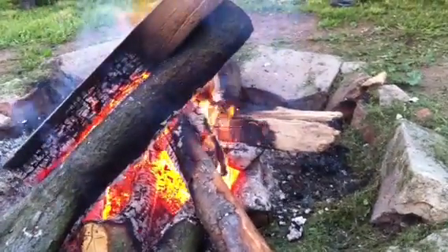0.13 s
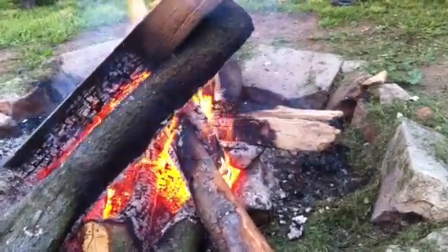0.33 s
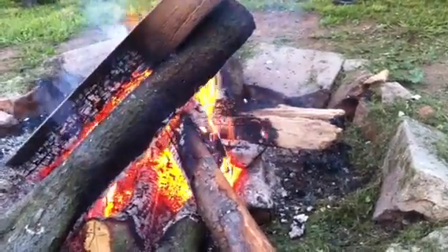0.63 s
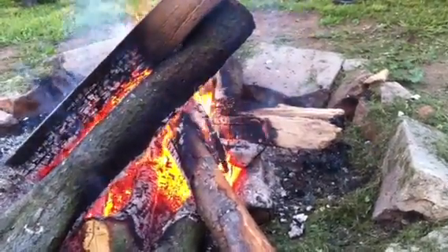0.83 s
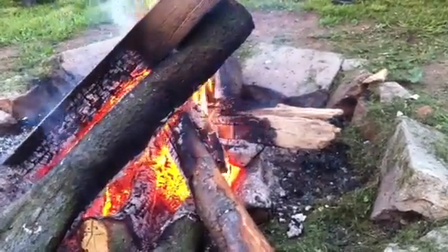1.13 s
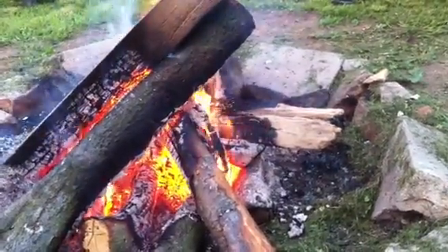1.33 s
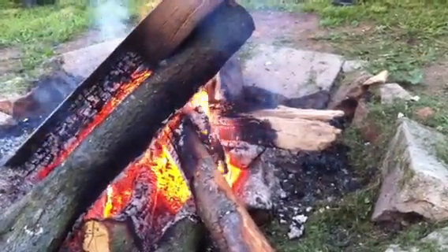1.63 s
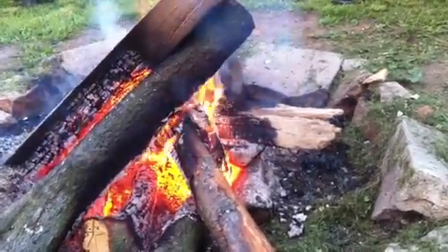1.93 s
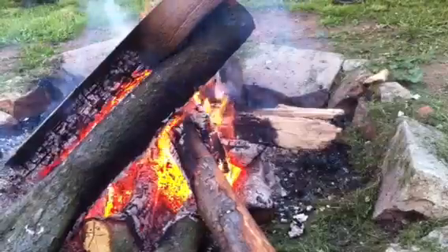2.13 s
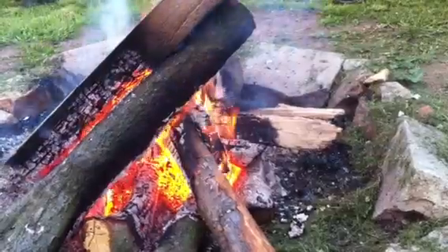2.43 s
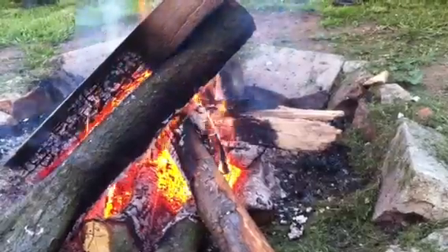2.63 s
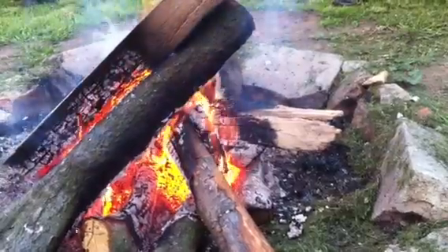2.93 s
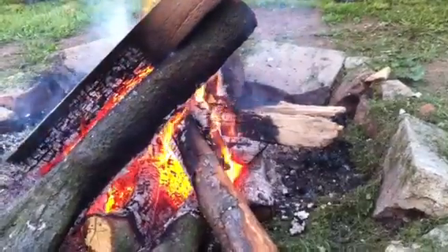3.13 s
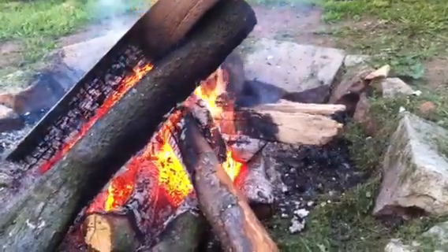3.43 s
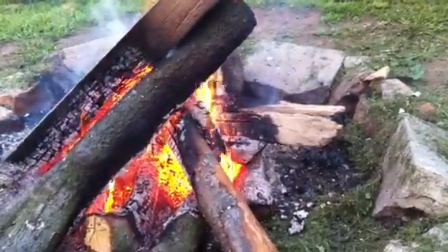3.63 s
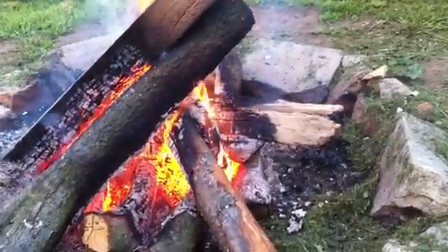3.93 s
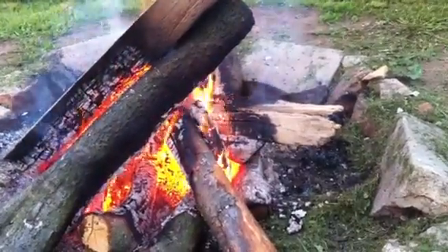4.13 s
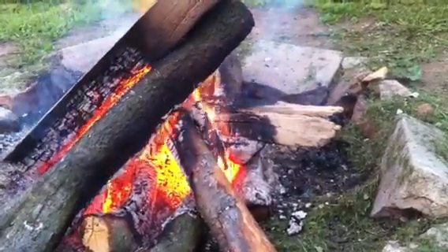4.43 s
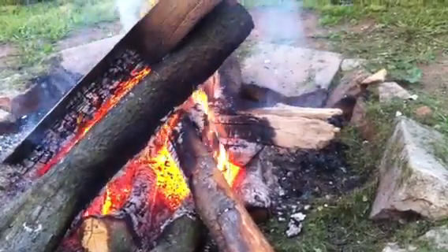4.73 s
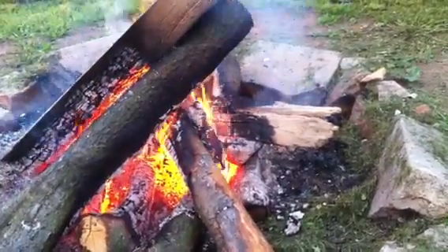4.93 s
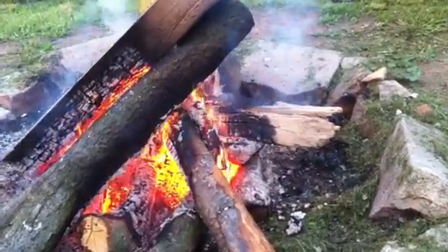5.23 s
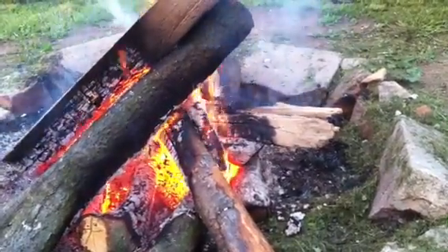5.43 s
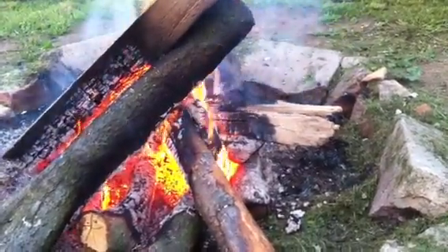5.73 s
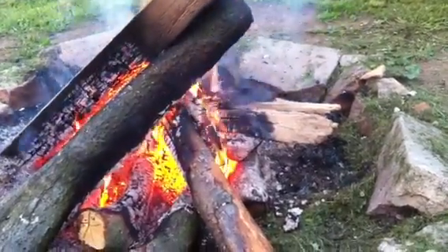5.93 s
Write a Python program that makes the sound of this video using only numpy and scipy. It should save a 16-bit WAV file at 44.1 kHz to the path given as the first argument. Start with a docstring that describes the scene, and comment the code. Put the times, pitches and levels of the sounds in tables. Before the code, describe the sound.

Outdoors, one microphone hears a wood fire: a low flickering murmur, soft airy hiss, a patter of tiny ticks and irregular dry pops. At 0.04 s a nightingale flicks out a quick, high slur that plunges, then falls silent. Faint far birds call and twitter thinly until about 1.5 s, with stray notes up to 2.8 s, while pops cluster around 1.4-1.8 s. At 2.5 s the singer gives a clear note stepping upward, at 3.0 s a falling slur, at 3.2 s a small arching note, then dry ticks. From 3.47 to 4.6 s harsh two-voiced rasps alternate with rounded double chirps, four times a second. A log cracks sharply with a short woody ring at 3.92 s. A strong snap at 4.68 s meets a sharp falling slur. Six low, softer whistles, each scooping up, run from 4.8 to 6 s; another bright pop lands at 5.26 s. Leaves and stones add slight reflections.

```python
"""Far birds call faintly over a murmuring, hissing, popping wood fire as a nightingale opens its strophe close by.
Its syrinx tones bend through thin slurs and two longer notes, break into dry ticks, then trade double chirps
with harsh two-voiced rasps. Amid this trill a log cracks: a noise tear with ringing wood modes.
Six low scooped whistles end the song. Pops are filtered bursts, flames and steam are tinted noise,
and the far calls are wavering sine glides."""
import sys
import numpy as np
from scipy import signal
from scipy.fft import rfft, irfft
from scipy.io import wavfile
from scipy.ndimage import uniform_filter1d

SR = 44100
rng = np.random.default_rng(int(sys.argv[2]) if len(sys.argv) > 2 else 0)


def master_out(mix):
    """Clip the mix to full scale and print it as 16-bit PCM to the path in sys.argv[1]."""
    frames = np.transpose(np.atleast_2d(mix))
    ceiling = np.clip(frames, -1, 1)
    pcm = np.round(ceiling * 32767).astype(np.int16)
    wavfile.write(sys.argv[1], SR, pcm)


N = 267775  # samples, about 6.07 s

# All song levels below are those of the voice itself, ahead of the garden's reflections.
# single slurs: (t/s, length/s, first f/Hz, middle f/Hz, last f/Hz, level/dB, swell over the note/dB, roughness 0-1)
SLURS = [(.037, 0.0119, 6530, 6030, 6950, -42, 20.5, 0.14),
         (0.05, 0.0212, 7060, 8480, 6830, -49.5, 0.5, 0.14),
         (0.0715, 0.0298, 7020, 4766, 3920, -34.5, -19.5, 0.02),
         (2.952, 0.01195, 4060, 5400, 6820, -45, 11, 0), (2.995, 0.0256, 7970, 7150, 6630, -62, 9.5, .05),
         (3.017, 0.0439, 6840, 5814, 5057, -37, -3.5, 0.04),
         (3.131, 0.034, 1960, 2174, 2078, -39.5, 2.5, 0.07),
         (4.449, 0.02596, 5837, 5723, 6414, -28.5, -3.5, 0.12),
         (4.484, .012, 6815, 4998, 3500, -33.5, -19, 0.42),
         (4.7, 0.01465, 6990, 4996, 3876, -31.5, 2, 0.38),
         (4.709, 0.04, 2494, 1900, 1180, -52.5, -13.5, 0.42),
         (4.718, 0.0287, 4288, 3679, 2400, -39, -19, 0.35)]
SLUR_ATTACK, SLUR_RELEASE = 0.2053, 0.22  # shares of a slur's length
# two longer notes, one stepping up and one arching over, as points along each:
# (t/s, f/Hz before smoothing, level/dB before the note's gain)
BENT_NOTES = [
    [(2.53, 3284, -66), (2.55, 3299, -51.5), (2.58, 3264, -50.5), (2.598, 3533, -63.5), (2.62, 3706, -44),
     (2.644, 3712, -37.5), (2.66, 3720, -59.5)],
    [(3.205, 2695, -65), (3.213, 2744, -38), (3.231, 3134, -40.5), (3.239, 3036, -36), (3.257, 2466, -38.5),
     (3.263, 2520, -42), (3.27, 2546, -69.5)],
]
# dry ticks that lead into the trill: (t/s, level/dB)
TICKS = [(3.33, -44), (3.358, -43), (3.385, -49)]
TICK_S, TICK_HZ = 0.0083, (5400, 4383, 4120)  # length; first, middle and last pitch
# double chirps: (t/s, gap to the second chirp/s, length of each/s, top f/Hz before the pair's factor, level/dB)
CHIRPS = [(3.57, 0.0448, 0.0326, 2372, -31.5), (3.809, 0.0465, 0.0363, 2386, -31.5),
          (4.054, 0.04393, 0.0393, 2348, -31.5), (4.303, 0.04385, 0.03935, 2344, -32),
          (4.546, 0.0423, 0.0365, 2276, -32)]
# the pitch starts this share low; level at the bottom; share of the climb where the voice is at full level
CHIRP_DEPTH, CHIRP_SOFT_DB, CHIRP_OPEN = 0.3096, -18.5, 0.384
# first and second chirp of a pair: (pitch factor, lowest at, highest at, release), last three in shares of length
CHIRP_PAIR = [(0.998, 0.133, 0.7018, 0.175), (1.036, 0.044, .66, 0.374)]
# rasps between the chirps: (t/s, length/s, pitch factor, level/dB before the stroke's own, roughness 0-1)
RASPS = [(3.467, 0.04585, 1.01, -36, 0.25), (3.708, 0.0444, 1.047, -31.5, 0.34),
         (3.952, .046, 1.026, -32, 0.37), (4.205, 0.0481, 0.9845, -35.5, 0.5)]
# both sides of the syrinx sweep up, then one snaps down: (start and length as shares of the rasp,
# first f/Hz, middle f/Hz, last f/Hz before the rasp's factor, relative level/dB, swell/dB, added roughness)
RASP_STROKES = [(0, 0.63, 4300, 5694, 6670, -2, -1, 0), (-.03, 0.75, 3300, 4546, 5800, -5.5, 1.5, 0),
                (0.739, .25, 6900, 4500, 3450, -2, -18.5, 0.108)]
# closing whistles: (t/s, length/s, held f/Hz, level/dB, waver as a share of the pitch, upper voice level/dB)
WHISTLES = [(4.806, .099, 1633, -45.5, 0.0172, -53), (4.985, .11, 1682, -45.5, 0.00636, -59),
            (5.178, .122, 1708, -46, 0.0038, -61), (5.383, 0.1412, 1765, -42, 0.0051, -63),
            (5.619, 0.1338, 1745, -42, 0.0043, -63.5), (5.849, 0.134, 1760, -42.5, 0.0041, -64)]
# each whistle slides up from below: share of its pitch, time, level at the bottom
SCOOP, SCOOP_S, SCOOP_DB = 0.2844, 0.01802, -5.5
# and sinks as it ends: share of its pitch, time; the level sags throughout
DROOP, DROOP_S, WHISTLE_SAG_DB_PER_S = 0.035, 0.0148, -9
WHISTLE_ATTACK_S, WHISTLE_RELEASE_S = 0.00792, 0.0189
UPPER_LEAD_S, UPPER_S, UPPER_HZ = .009, 0.02694, (1820, 2400, 2870)  # upper voice: head start, length, pitches

LOG_CRACK_S = 3.9245
# modes of the splitting log: (f/Hz, level/dB before the band-pass, t60/s)
LOG = [(184.6, -23, 0.026), (433, -21, 0.027), (553, -25.5, 0.0329), (798, -21, 0.0249),
       (1081, -28, 0.0346), (1372, -19.5, 0.0173), (1547.6, -14, 0.0215), (1946, -17.5, 0.019),
       (2458, -31, 0.047), (2841, -23.5, 0.0206), (3210, -26.5, 0.021), (3420, -19.5, 0.017),
       (3750, -24, 0.033), (4374, -29, 0.0142), (4425, -34, 0.0475), (7658, -26, 0.012)]
# loud pops of the fire: (t/s, knock level/dB, crack level/dB, snap level/dB),
# each the level of the first instant, before the mix with reflections
POPS = [(0.2714, -54, -55, -44.5), (0.3181, -47, -50, -44), (.414, -49, -51, -53),
        (0.6266, -54, -51.5, -37.5), (0.6412, -60, -55, -37.5), (0.6861, -59, -58, -50.5),
        (0.8717, -54.5, -55.5, -54.5), (1.0834, -48, -50, -44), (1.4447, -53.5, -41.5, -70.5),
        (1.4994, -58, -44.5, -42), (1.5341, -45.5, -44.5, -37.5), (1.6967, -43, -46.5, -42.5),
        (1.734, -54, -54.5, -65), (1.8302, -45, -45, -41.5), (2.335, -54.5, -58.5, -67.5),
        (2.4557, -72, -59, -51.5), (2.827, -49, -44.5, -38.5), (3.405, -43, -37, -41.5),
        (3.671, -49, -41, -38.5), (4.1601, -58.5, -64.5, -54), (4.3982, -54, -49.5, -46),
        (4.4057, -51.5, -59, -49), (4.5176, -58, -51, -51), (4.6768, -38, -35, -26.5),
        (4.9598, -50, -48.5, -43.5), (5.2623, -42, -34.5, -25), (5.7063, -43.5, -36.5, -47),
        (6.0026, -50, -42, -47)]
# knock, crack and snap in turn: (low f/Hz, high f/Hz)
POP_BANDS = [(1100, 3160), (4700, 8270), (9200, 15100)]
# spectrum of the flames' murmur: (f/Hz, relative density/dB per Hz)
FLAME = [(15, -66.5), (25, -33.5), (43, -45.5), (90, -10.5), (189, 0.5), (240, -7), (452, -14), (648, -19),
         (756, -18), (913, -20), (1030, -19.5), (1500, -29), (1950, -33), (3300, -120)]
# spectrum of the escaping steam: (f/Hz, relative density/dB per Hz)
HISS = [(300, -6.5), (1200, 0), (2000, 0.5), (3500, -2.5), (6000, -5), (8000, -3.5), (10000, -7),
        (13000, -2.5), (15700, -4), (16100, -41.5)]
FLAME_DB, HISS_DB = -66.5, -67.5  # before flicker, sizzle and the slow drift of the hiss

# the clearer calls of far birds: (t/s, length/s, first f/Hz, middle f/Hz, last f/Hz, level/dB before the trees)
FAR_NOTES = [(0, 0.0257, 2782, 2750, 2590, -61.5), (0.455, 0.117, 1830, 2000, 1895, -63.5),
             (0.783, 0.121, 3310, 3750, 4300, -65), (0.877, 0.252, 1950, 2009, 1991, -71),
             (0.956, 0.08, 4434, 4420, 4470, -61), (1.931, 0.097, 2640, 2600, 2580, -68),
             (2.222, 0.1816, 2370, 2290, 2228, -66), (2.069, .017, 1792, 2200, 2830, -59.5),
             (2.384, 0.0092, 1990, 2055, 2020, -54.5), (2.804, 0.0207, 1246, 1380, 1480, -54),
             (2.825, 0.0151, 1880, 2000, 1935, -50.5)]
# one far bird twitters on two thin notes in turn; level before the trees
TWITTER_FROM_S, TWITTER_TO_S, TWITTER_NOTE_S = .157, 1.54, 0.058
TWITTER_HZ, TWITTER_DB = (5710, 4880), -67.5
EDGE_HZ = 16500  # top of the recorder's band


def nightingale(dip=0.83, leaves_db=-9):
    """The song, with a ground reflection, scatter from leaves and branches, and a faint garden echo."""
    song = strophe()
    direct = song + amp(-18) * delayed(song, .0052)
    # small leaves throw back the high notes most
    leaves = amp(leaves_db) * scatter(band(song, 3260, 10000), 0.00089, 0.0565)
    branches = amp(-15.5) * scatter(song, 0.0066, 0.0556)
    garden = amp(-38) * scatter(song, .02, .4)
    heard = direct + leaves + branches + garden
    # a hollow in the spectrum splits the rasps in two bands
    return heard - np.clip(dip, 0, .9) * band(heard, 4178, 5252, order=1)


def strophe():
    """Slurs, bent notes and ticks, a trill of double chirps and rasps, then whistles that start on two voices."""
    song = np.zeros(N)
    for s, length, *pitches_hz, db, swell_db, rough in SLURS:
        add(song, s, slur(length, pitches_hz, db, swell_db, rough))
    for points in BENT_NOTES:
        add(song, *bent_note(points))
    for s, db in TICKS:
        add(song, s, slur(TICK_S, TICK_HZ, db, swell_db=2, rough=0.971))
    for s, gap, *note in CHIRPS:
        for start, shape in zip((s, s + gap), CHIRP_PAIR):
            add(song, start, chirp(*note, *shape))
    for s, length, pitch, db, rough in RASPS:
        add_rasp(song, s, length, pitch, db, rough)
    for s, *note, upper_db in WHISTLES:
        add(song, s, whistle(*note))
        add(song, s - UPPER_LEAD_S, slur(UPPER_S, UPPER_HZ, upper_db, swell_db=-12, rough=0.52))
    return song


def slur(length, pitches_hz, db, swell_db, rough):
    """One smooth bend through a first, middle and last pitch, swelling or fading as it goes."""
    u = np.linspace(0, 1, int(length * SR))
    hz = np.polyval(np.polyfit([0, .5, 1], pitches_hz, 2), u)
    level_db = db + swell_db * (u - .5)
    return syllable(hz, rough) * amp(level_db) * envelope(u, SLUR_ATTACK, SLUR_RELEASE)


def bent_note(points, gain_db=3, rough=0.032):
    """A clear note that follows its own pitch and level; returns its start and sound."""
    s, hz, db = np.transpose(points)
    t = np.arange(s[0], s[-1], 1 / SR)
    smooth_hz = uniform_filter1d(np.interp(t, s, hz), size=200)
    return s[0], syllable(smooth_hz, rough) * amp(gain_db + np.interp(t, s, db))


def chirp(length, top_hz, db, pitch, low_at, high_at, release, attack=0.0384, rough=0.032):
    """The pitch swings from a trough over a crest; the voice opens as it climbs."""
    u = np.linspace(0, 1, int(length * SR))
    height = np.sin(np.pi / 2 * (u - low_at) / (high_at - low_at)) ** 2
    hz = pitch * top_hz * (1 - CHIRP_DEPTH * (1 - height))
    level_db = db + CHIRP_SOFT_DB * np.maximum(1 - height / CHIRP_OPEN, 0)
    return syllable(hz, rough) * amp(level_db) * envelope(u, attack, release)


def add_rasp(song, s, length, pitch, db, rough):
    """Two rough voices of the syrinx sweep up together, then one snaps down."""
    for start, share, *pitches_hz, stroke_db, swell_db, harsher in RASP_STROKES:
        stroke_hz = pitch * np.array(pitches_hz)
        stroke = slur(share * length, stroke_hz, db + stroke_db, swell_db, rough + harsher)
        add(song, s + start * length, stroke)


def whistle(length, held_hz, db, waver, waver_hz=30, rough=0.0423,
            shimmer_db=.6, scoop_shimmer_db=2, shimmer_hz=70):
    """A low note that scoops up unsteadily, holds with a slight waver, and droops at the end."""
    t = np.arange(0, length, 1 / SR)
    below = np.exp(-(t / SCOOP_S) ** 2)
    droop = DROOP * np.exp((t - length) / DROOP_S)
    hz = held_hz * (1 - SCOOP * below - droop + waver * wander(len(t), waver_hz))
    level_db = db + SCOOP_DB * below + WHISTLE_SAG_DB_PER_S * (t - length / 2)
    level_db = level_db + (shimmer_db + scoop_shimmer_db * below) * wander(len(t), shimmer_hz)
    return syllable(hz, rough) * amp(level_db) * envelope(t, WHISTLE_ATTACK_S, WHISTLE_RELEASE_S)


def syllable(hz, rough, flutter=0.0653, flutter_hz=700, rasp_db=-3, rasp_hz=1000,
             second_db=-34, third_db=-34, harsh_db=30):
    """A nearly pure syrinx tone; in rough notes the pitch flutters and the tone breaks up into a band of noise."""
    rough = np.clip(rough, 0, 1)
    hz = hz * (1 + flutter * rough * wander(len(hz), flutter_hz))
    phase = 2 * np.pi * np.cumsum(hz) / SR
    # only the lower notes carry overtones, the octave more so when the voice is harsh
    octave = amp(second_db + harsh_db * rough) * np.sin(2 * phase) * (hz < SR / 9)
    twelfth = amp(third_db) * np.sin(3 * phase) * (hz < SR / 11)
    tone = np.sin(phase) + octave + twelfth
    rasp = wander(len(hz), rasp_hz) * np.sin(phase) + wander(len(hz), rasp_hz) * np.cos(phase)
    return np.sqrt(1 - rough ** 2) * tone + rough * amp(rasp_db) * rasp


def log_crack(tear_s=0.00171, tear_db=-21, fizz_db=-21):
    """A log splits: a short tearing burst, the ring of the wood, and reflections from the stones."""
    t = np.arange(SR // 8) / SR
    ring = np.zeros(len(t))
    for k, (hz, db, t60) in enumerate(LOG):
        ring += (-1) ** k * amp(db - 60 * t / t60) * np.sin(2 * np.pi * hz * t)
    noise = rng.standard_normal(len(t))
    tear = amp(tear_db) * unit(band(noise, 1290, 9140)) + amp(fizz_db) * unit(band(noise, 10680, 13100))
    crack = np.zeros(N)
    add(crack, LOG_CRACK_S, band(ring + tear * np.exp(-t / tear_s), 98, 17000))
    echo = amp(-12) * band(delayed(crack, .0108), 2430, 14140)
    stones = amp(-12.5) * scatter(crack, 0.0039, 0.0324)
    tail = amp(-35.5) * scatter(crack, 0.015, 0.17)
    return crack + echo + stones + tail


def crackle(ticks_per_s=60, tick_db=-73, spread_db=4.5, dull_db=-5, small_pops_per_s=2, small_pop_db=-57):
    """Loud pops, stray small ones and a patter of tiny ticks, thrown about by the logs and the ring of stones."""
    pops = np.zeros(N)
    for s, *levels_db in POPS:
        add(pops, s, pop(levels_db))
    for per_s, base_db, range_db in [(ticks_per_s, tick_db, spread_db), (small_pops_per_s, small_pop_db, 0)]:
        for when, size, colour in rng.random((int(per_s * N / SR), 3)):
            db = base_db + range_db * min(-np.log(size), 4)  # many weak, few strong
            add(pops, when * N / SR, pop([db + 2 * dull_db * colour, db + dull_db * colour, db]))
    # rough bark returns less of the top
    near = amp(-6.5) * scatter(band(pops, 660, 10160, order=1), 0.0015, 0.0234)
    tail = amp(-49.5) * scatter(pops, 0.009, .16)
    return amp(-3.5) * pops + near + tail


def pop(levels_db, burst_s=0.000453, grit_db=-11):
    """A gas pocket bursts in one spike and a gritty instant, with its own share of knock, crack and snap."""
    t = np.arange(400) / SR
    burst = (t == 0) + amp(grit_db) * rng.standard_normal(len(t)) * np.exp(-t / burst_s)
    sound = np.zeros(len(t))
    for k, (db, (lo, hi)) in enumerate(zip(levels_db, POP_BANDS)):
        part = (-1) ** k * band(burst, lo, hi)
        first_rms = np.sqrt(np.mean(part[:66] ** 2))  # over the first 1.5 ms
        sound += amp(db) * part / first_rms
    return sound


def flames(flicker_db=2.04, flicker_hz=14, sizzle_db=1.0):
    """The low murmur of flickering flames under the hiss of steam leaving the wood."""
    murmur = tinted_noise(FLAME, patchy_db=1.5) * amp(FLAME_DB + flicker_db * wander(N, flicker_hz))
    steam = tinted_noise(HISS, patchy_db=1.5) * amp(HISS_DB + sizzle_db * wander(N, 22.1))
    drift_db = np.interp(np.arange(N) / SR, [0, 2.2, 4.5, 6], [-0.97, -1.5, 1, 1.0])
    return murmur + steam * amp(drift_db)


def far_birds(waver=0.0084):
    """Faint wavering glides, blurred by the trees between."""
    calls = np.zeros(N)
    for s, length, first, middle, last, db in list(FAR_NOTES) + twitter():
        u = np.linspace(0, 1, int(length * SR))
        hz = np.interp(u, [0, .5, 1], [first, middle, last]) * (1 + waver * wander(len(u), 80))
        swell = np.sqrt(4 * u * (1 - u))
        add(calls, s, amp(db) * swell * np.sin(2 * np.pi * np.cumsum(hz) / SR))
    return amp(-4.5) * calls + amp(-7.5) * scatter(calls, 0.0031, 0.212)


def twitter(count=12, loose_s=.025, stray=0.02655, bend=0.013, uneven_db=2):
    """Loosely timed notes, high and low in turn, each with its own pitch, bend and strength."""
    starts = np.linspace(TWITTER_FROM_S, TWITTER_TO_S, count)
    notes = []
    for k, (late, higher, louder, *bends) in enumerate(rng.uniform(-1, 1, (count, 6))):
        pitches_hz = TWITTER_HZ[k % 2] * (1 + stray * higher + bend * np.array(bends))
        db = TWITTER_DB + uneven_db * louder
        notes.append((starts[k] + loose_s * late, TWITTER_NOTE_S, *pitches_hz, db))
    return notes


def tinted_noise(spectrum, patchy_db):
    """Noise of a given spectrum, rms 1, whose level drifts in small patches of time and frequency."""
    hz = np.fft.rfftfreq(2048, 1 / SR)
    a, b, patches = rng.standard_normal((3, N // 512 + 5, len(hz)))
    f, db = np.transpose(spectrum)
    patches = unit(uniform_filter1d(uniform_filter1d(patches, size=8, axis=0), size=20, axis=1))
    level_db = np.interp(np.log(hz + 1), np.log(f), db) + patchy_db * patches
    frames = (a + 1j * b) * amp(level_db)
    return unit(signal.istft(frames.T, nperseg=2048, noverlap=1536)[1][:N])


def scatter(x, first_s, t60):
    """Dense reflections that set in after a delay and die away; taps of energy 1."""
    t = np.arange(SR // 2) / SR
    taps = rng.standard_normal(len(t)) * (t > first_s) * amp(-60 * t / t60)
    return signal.fftconvolve(x, taps / np.linalg.norm(taps))[:N]


def delayed(x, s):
    """One reflection, s seconds later."""
    return np.interp(np.arange(N) - s * SR, np.arange(N), x, left=0)


def wander(size, rate_hz):
    """Smooth random drift of about rms 1, fading out above a rate."""
    padded = size + SR // 10
    hz = np.fft.rfftfreq(padded, 1 / SR)
    spectrum = rfft(rng.standard_normal(padded)) * np.exp(-(hz / rate_hz) ** 2)
    return unit(irfft(spectrum))[:size]


def envelope(t, attack_s, release_s):
    """Smooth attack, hold, smooth release; times in the unit of t."""
    ramp = np.minimum(t / attack_s, (t[-1] - t) / release_s)
    return np.sin(np.pi / 2 * np.clip(ramp, 0, 1)) ** 2


def band(x, lo_hz, hi_hz, order=2):
    """Causal band-pass."""
    edges_hz = np.clip([lo_hz, hi_hz], 20, .49 * SR)
    return signal.sosfilt(signal.butter(order, edges_hz, "band", fs=SR, output="sos"), x)


def amp(db):
    """Decibels to gain."""
    return 10 ** (np.asarray(db) / 20)


def unit(x):
    """Scales to rms 1."""
    return x / np.sqrt(np.mean(x ** 2) + 1e-20)


def add(mix, s, sound):
    """Mixes a sound in at time s."""
    part = mix[max(round(s * SR), 0):][:len(sound)]
    part += sound[:len(part)]


def scene():
    """Birds and fire at one microphone."""
    return (nightingale() + log_crack() + crackle() + flames() + far_birds())[None]


def record(dry):
    """The band limit of the recorder: a steep low-pass."""
    lowpass = signal.firwin(511, EDGE_HZ, window=("kaiser", 9), fs=SR)
    return signal.oaconvolve(dry, lowpass[None], "same")


dry = scene()
out = record(dry)
master_out(out)
```